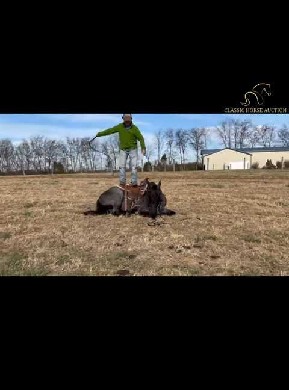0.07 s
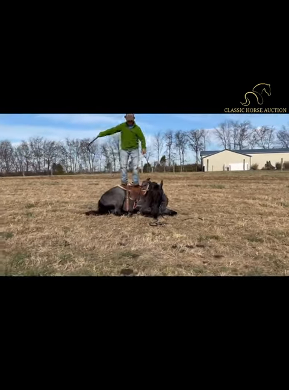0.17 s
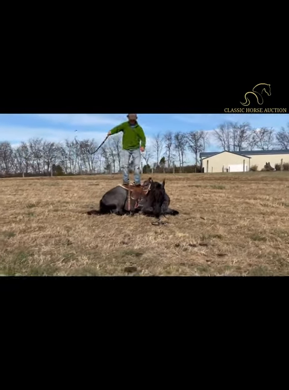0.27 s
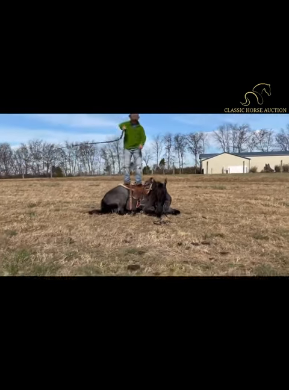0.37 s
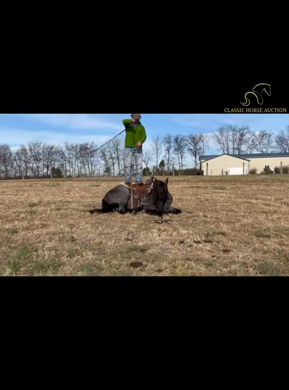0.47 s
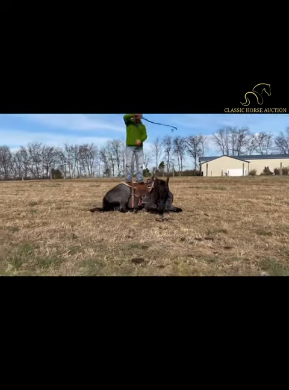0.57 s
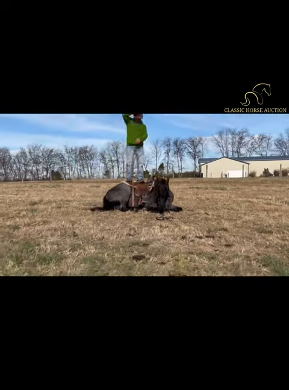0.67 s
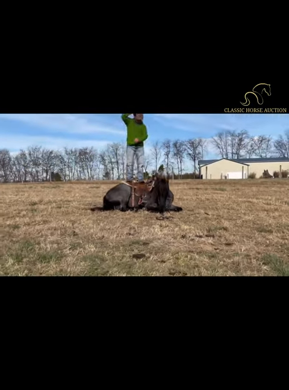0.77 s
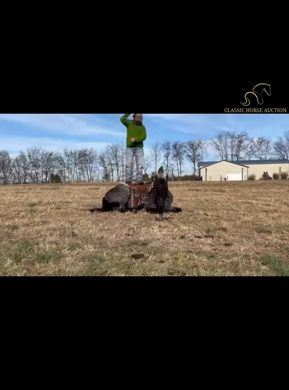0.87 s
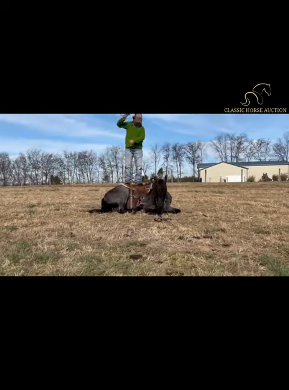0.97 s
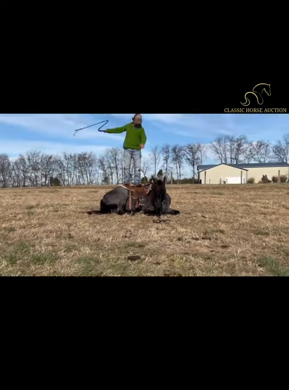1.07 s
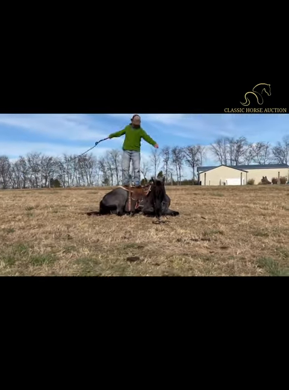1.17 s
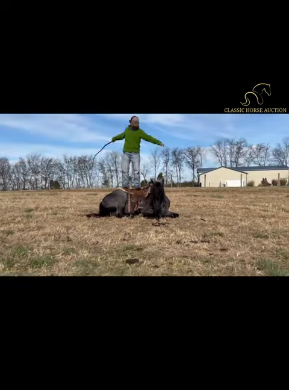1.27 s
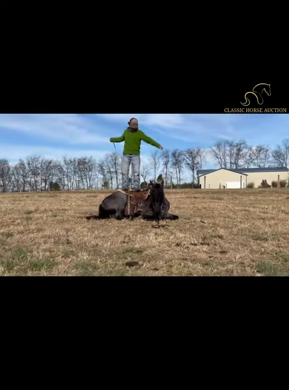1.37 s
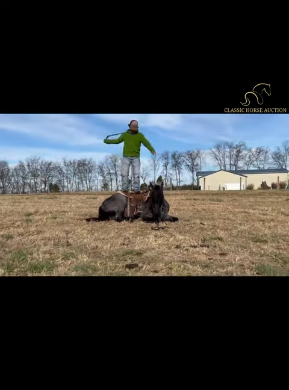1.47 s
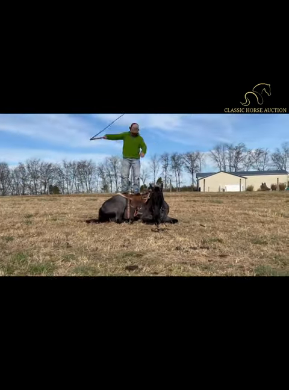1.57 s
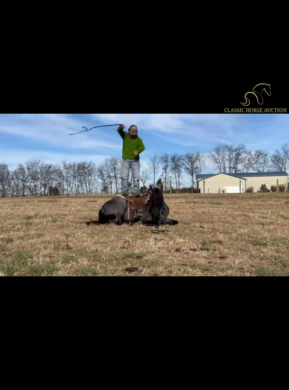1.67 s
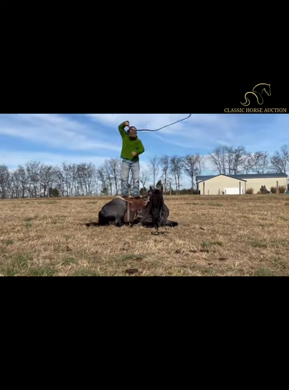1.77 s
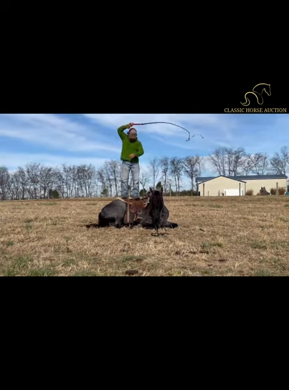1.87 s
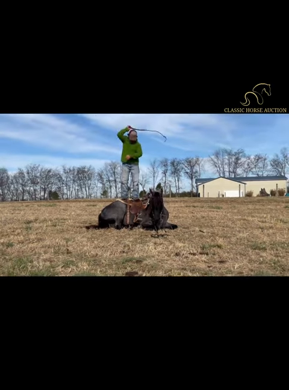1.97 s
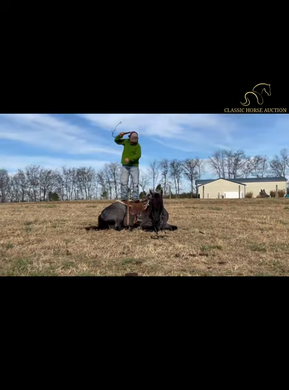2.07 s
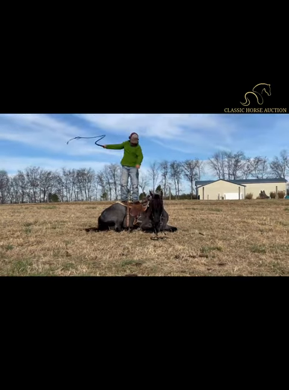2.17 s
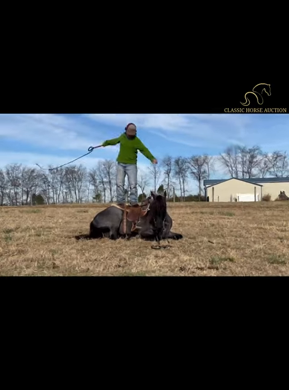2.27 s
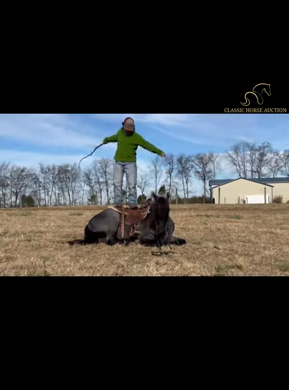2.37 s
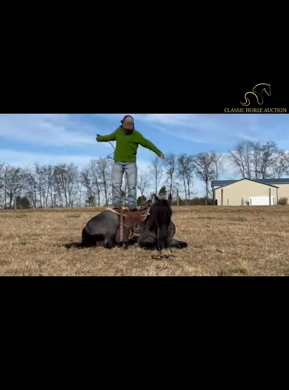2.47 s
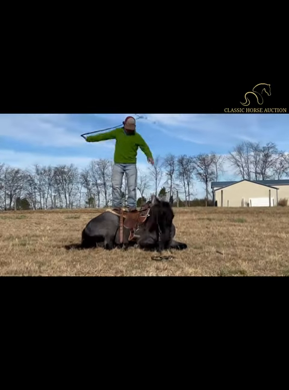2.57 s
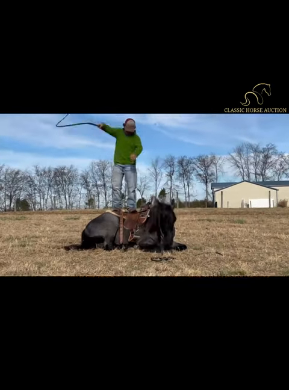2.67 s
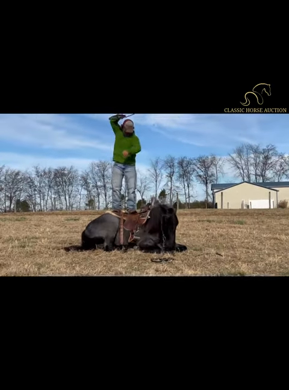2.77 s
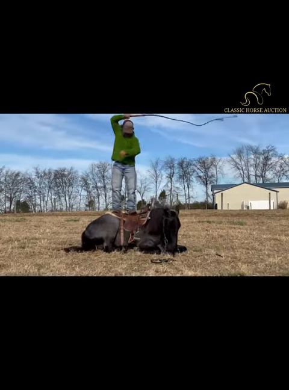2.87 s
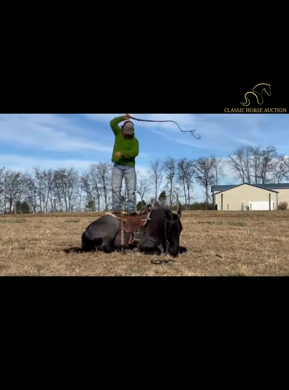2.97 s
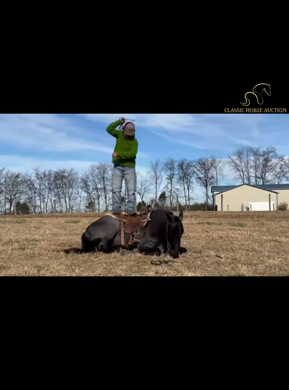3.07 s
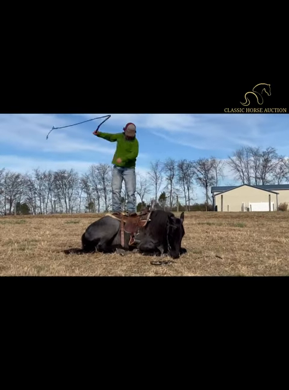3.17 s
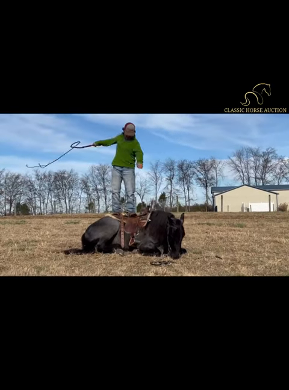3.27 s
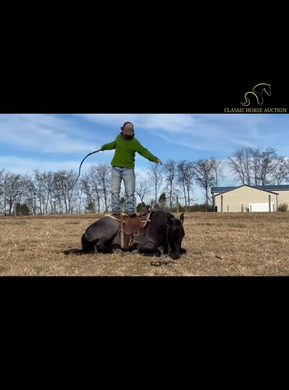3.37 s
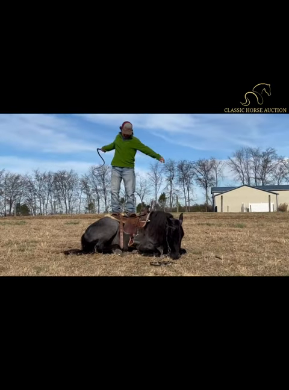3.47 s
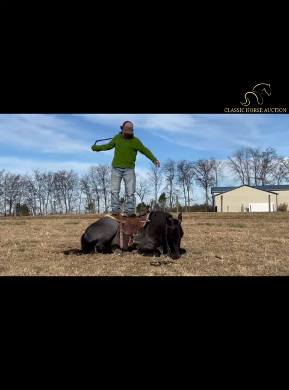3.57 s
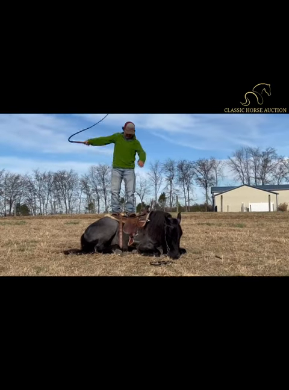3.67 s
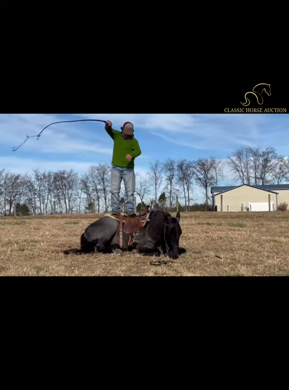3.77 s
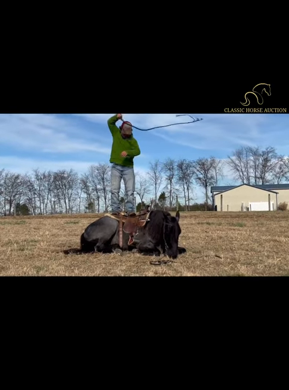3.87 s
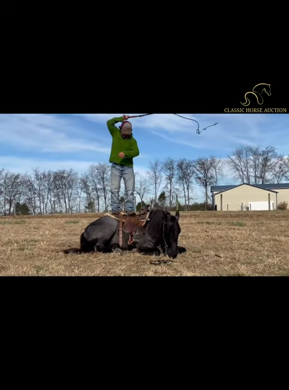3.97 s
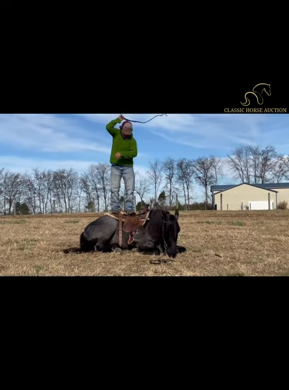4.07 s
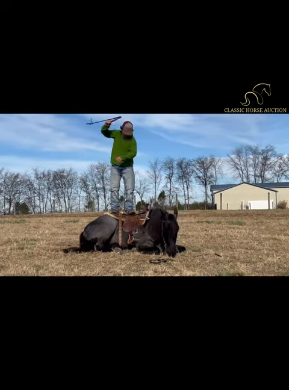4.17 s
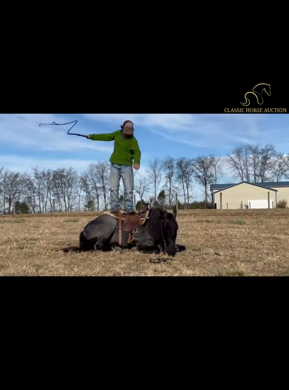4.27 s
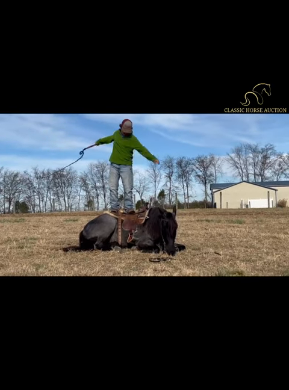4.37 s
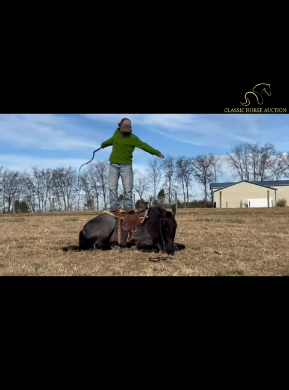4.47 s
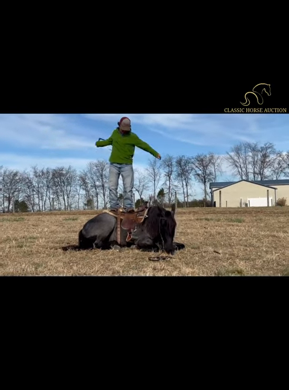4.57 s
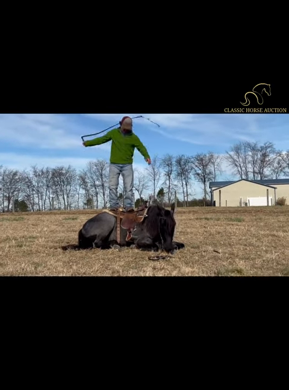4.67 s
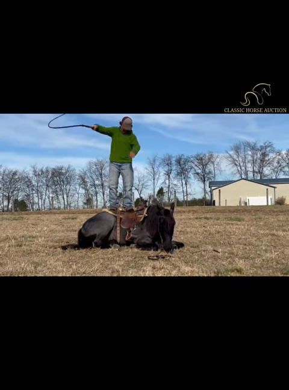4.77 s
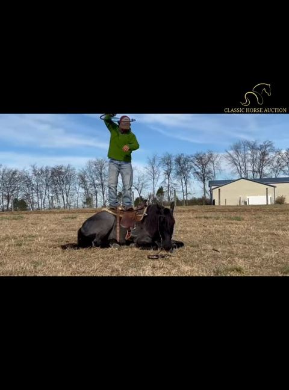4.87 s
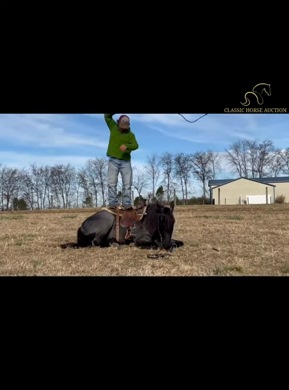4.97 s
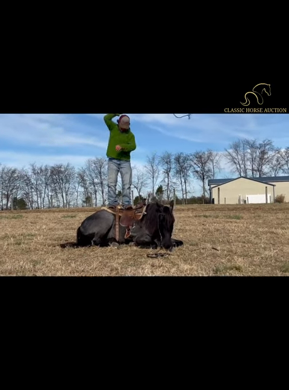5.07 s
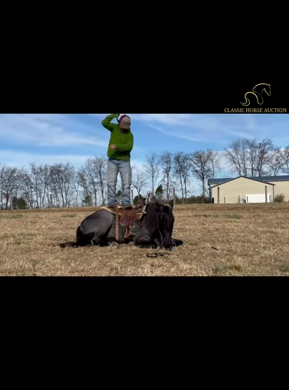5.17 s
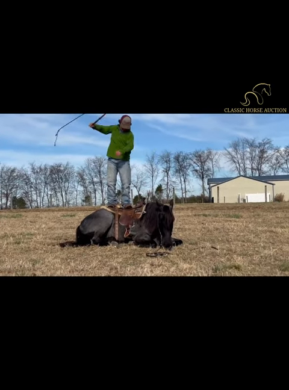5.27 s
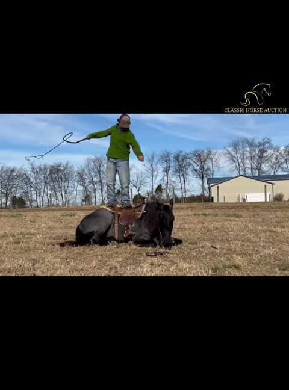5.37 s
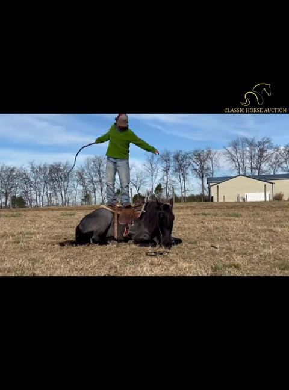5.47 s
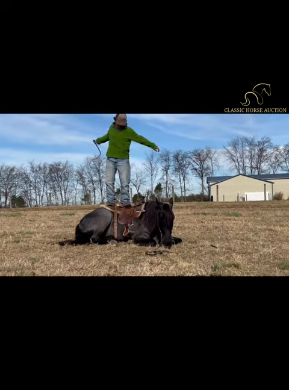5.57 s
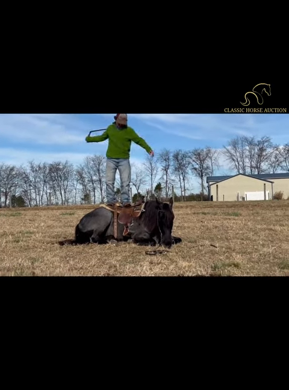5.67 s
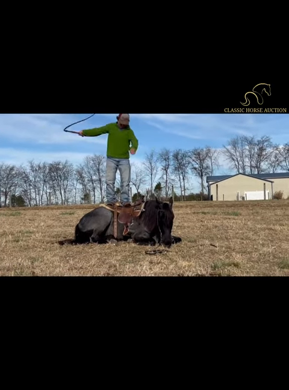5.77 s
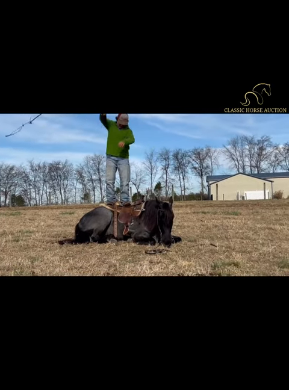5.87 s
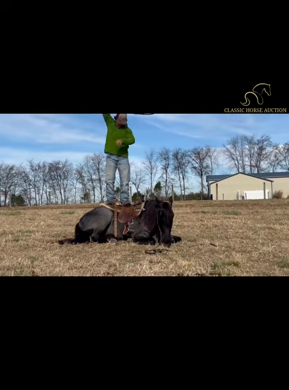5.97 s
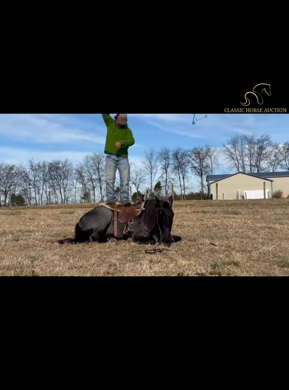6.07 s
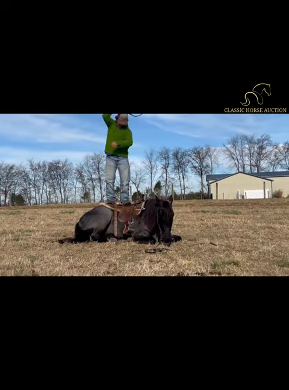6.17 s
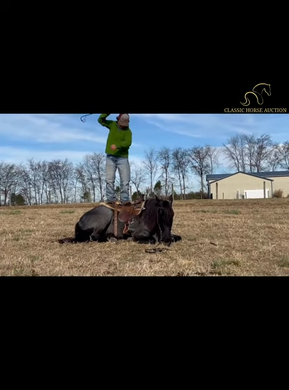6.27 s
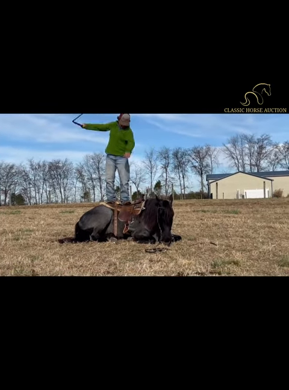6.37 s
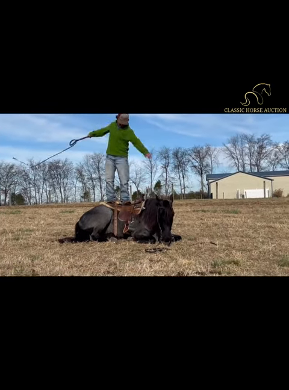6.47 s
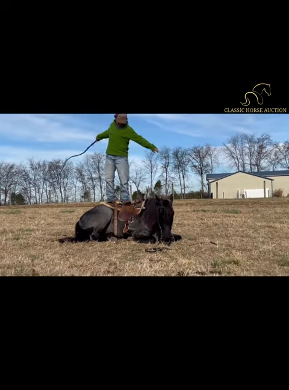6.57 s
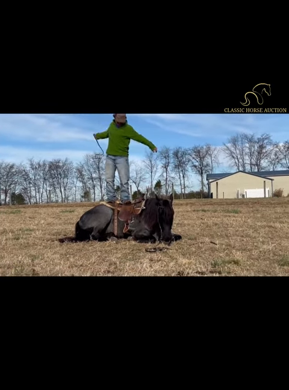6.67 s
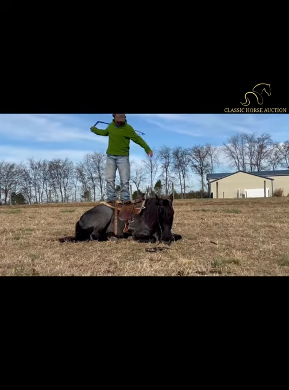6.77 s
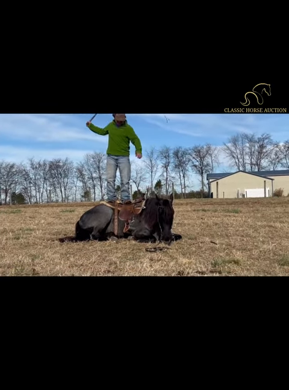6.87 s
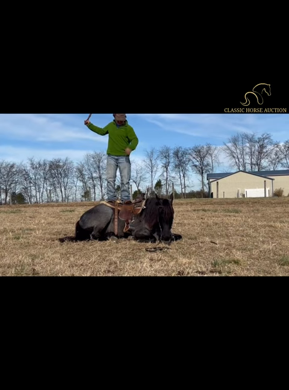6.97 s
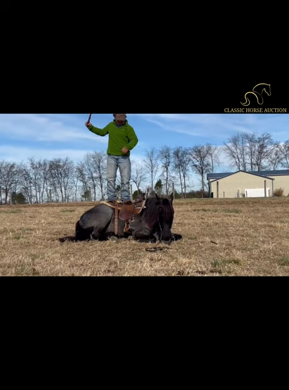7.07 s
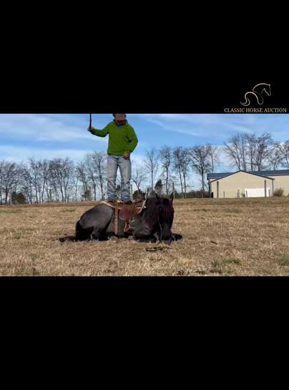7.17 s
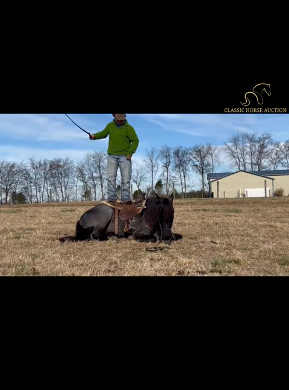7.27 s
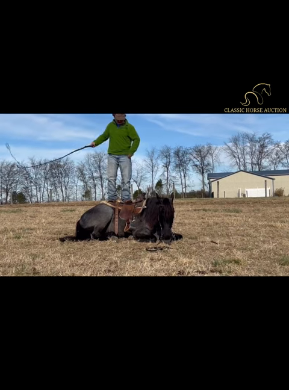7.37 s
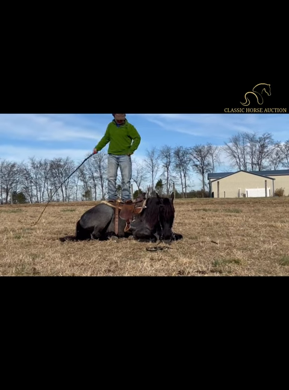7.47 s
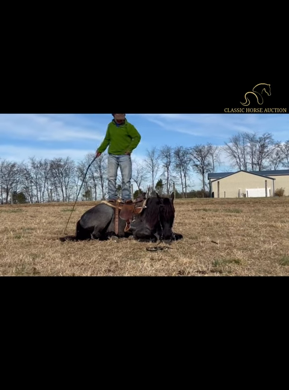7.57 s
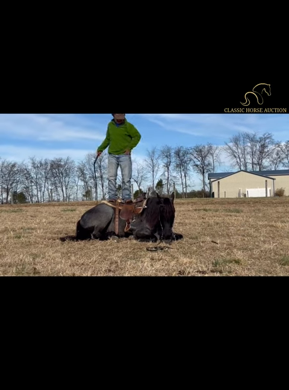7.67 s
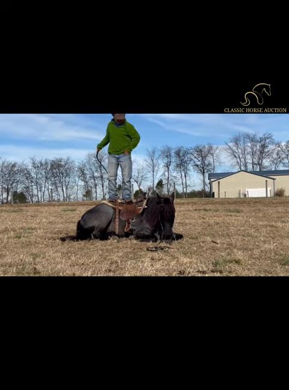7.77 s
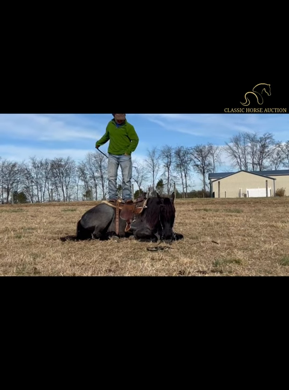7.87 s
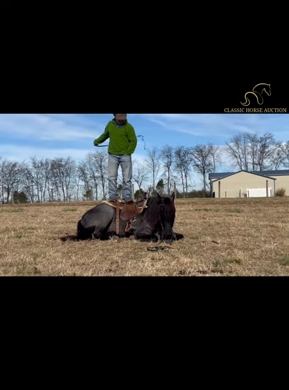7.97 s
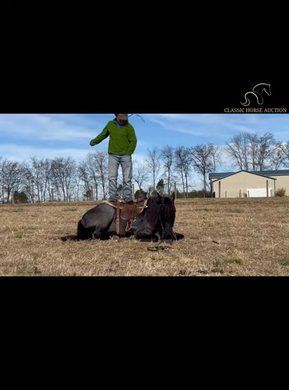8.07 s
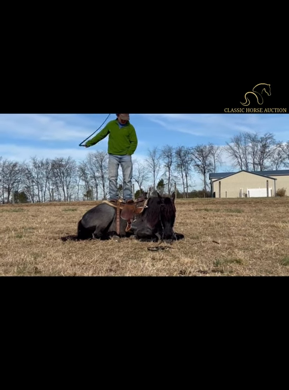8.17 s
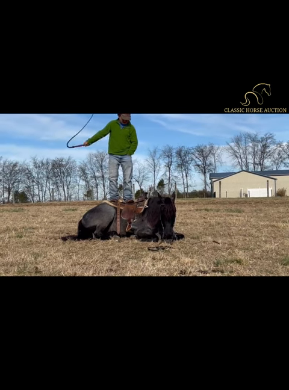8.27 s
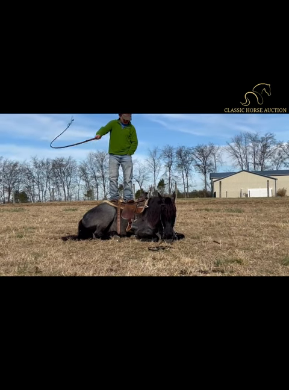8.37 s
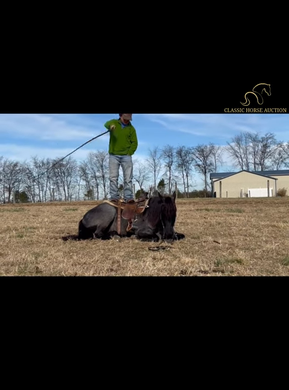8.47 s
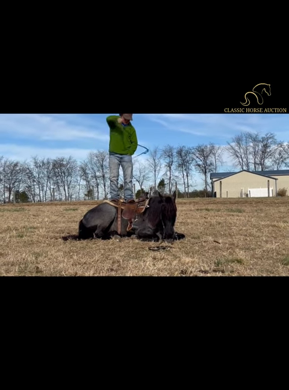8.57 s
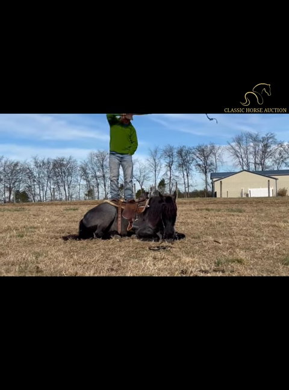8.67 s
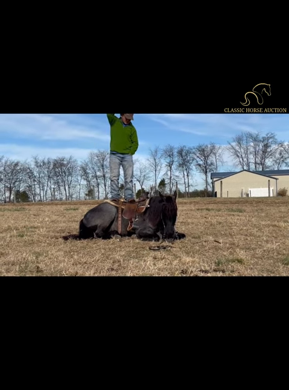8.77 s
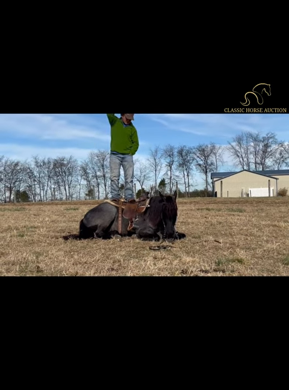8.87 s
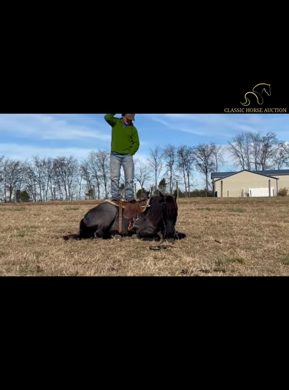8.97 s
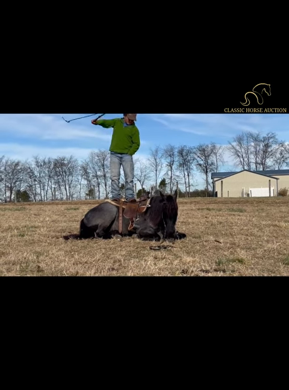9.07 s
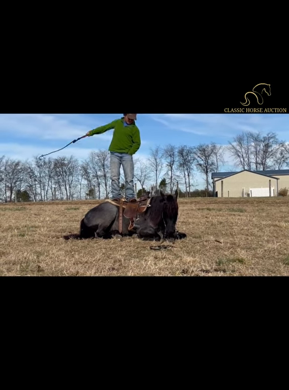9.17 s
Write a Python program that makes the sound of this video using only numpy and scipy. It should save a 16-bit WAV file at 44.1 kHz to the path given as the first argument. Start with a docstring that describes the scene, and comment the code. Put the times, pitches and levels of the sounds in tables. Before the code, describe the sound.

Low wind buffets the microphone softly outdoors while a lash rustles faintly in dry grass. Then comes a steady run of loud whip cracks, alternating between bright snaps and fuller pops, each led by a light swish and trailed by echoes off a building and distant trees. A lull follows with only wind, tiny ticks and grass rustle, and a single softer crack ends it.

```python
"""A long whip cracks in an open winter field, in turn out to the side and forward over the head.
Its tip goes supersonic and radiates a shock wave with a duller pop, heard directly and by ground
reflection. Grass scatters each crack; a nearby wall, a barn and distant trees return it as echoes.
Between cracks the lash sheds vortices, snaps lightly and drags through dry grass, with faint ticks.
Beneath it all, turbulent wind makes gusts on the microphone and a low rumble."""
import sys
import numpy as np
from scipy import signal
from scipy.fft import rfft, irfft, next_fast_len
from scipy.io import wavfile

SR = 44100
rng = np.random.default_rng(int(sys.argv[2]) if len(sys.argv) > 2 else 0)


def inscribe(sig):
    """Save sig as 16-bit PCM at rate SR to the path in sys.argv[1].

    A 1-D sig is mono; a 2-D sig holds one channel per row.
    Samples are clipped to [-1, 1] before scaling.
    """
    pcm = np.round(np.clip(np.atleast_2d(sig).T, -1, 1) * 32767)
    wavfile.write(sys.argv[1], SR, pcm.astype(np.int16))


N = 406161
TIME = np.arange(N) / SR

# Spectra of the shock, pop, rush and sizzle: (frequency [Hz], relative level [dB])
SHOCK_SPECTRUM = [(40, -21.5), (200, -13.5), (500, -2), (950, 0.5), (1900, -0.5), (2600, 3), (3200, 0),
                  (4100, -0.5), (6000, -6.5), (8500, -5), (11000, -16), (16000, -21.5)]
POP_SPECTRUM = [(40, -20), (90, -10), (160, -3), (270, -6), (500, 1.5), (1100, -1.5), (2000, -11),
                (4000, -26.5), (16000, -48.5)]
RUSH_SPECTRUM = [(100, -18.5), (400, -2), (900, 0), (1600, -3), (3500, -13), (8000, -17.5), (16000, -28.5)]
SIZZLE_SPECTRUM = [(500, -24.5), (2000, -13), (5000, -4), (8000, 0), (11500, -1.5), (15500, -4.5)]
# Treble shelf of the shock, whose gain varies by crack: (onset [Hz], full effect [Hz])
SHELF_HZ = (7800, 12200)
# Traits of each aim: (rush [dB], wall echo [dB], tree echo [dB], whoosh pitch [Hz],
# whoosh width [ratio], whoosh lead [s], follow-through [dB], tip hiss [dB])
THROWS = {"side": dict(rush_db=-52.5, wall_db=-71, trees_db=-61.5, whoosh_hz=495, whoosh_width=0.72, lead_s=.04, follow_db=-20, tip_db=-74),
          "front": dict(rush_db=-53, wall_db=-44.5, trees_db=-85.5, whoosh_hz=377.16, whoosh_width=0.88, lead_s=.052, follow_db=-5.5, tip_db=-85)}
# Cracks, with relative levels: (time [s], aim, shock [dB], pop [dB], ground lag [s],
# reflected shock [dB], reflected pop [dB], sizzle [dB], treble shelf [dB], whirr [dB], thump [dB],
# swing [dB], echo [dB], late slap [dB], slap delay [s])
WHIP_CRACKS = [(1.167, "side", 9, -1.5, .0043, 4.5, -14, -7.5, 0.5, -12.5, -42.5, -70.5, 1.5, -46.5, 0.35),
               (1.712, "front", 0.57, -18.5, .0047, 8.5, 0, -8.5, -9, -32, -49.5, -67, -2, -36, 0.23),
               (2.2585, "side", 9.5, -7, .0057, -3.5, -9.5, -6, -3, -14, -27, -70.5, 0.5, -44, .3455),
               (2.7739, "front", -8, 0, .0061, 0.2, 4.5, -12.5, -5.5, -32, -47, -64.5, -10, -39, .223),
               (3.2918, "side", 10, -9, .0065, -2.5, -18.5, -7, -2.5, -32.5, -42, -69, -1, -59.5, 0.34),
               (3.8247, "front", -1.5, 6.5, .0071, 0.5, 0, 0, 4, -29, -45.5, -59, 3, -55.5, .2265),
               (4.3475, "side", 8.5, -15.5, .007, -7, -18, -4.5, -7.5, -29, -42.5, -66.5, -6, -50, 0.34),
               (4.8714, "front", -7.5, -0.5, .005, 4.5, 6.5, -2, -7, -31.5, -43.5, -63, 1.5, -61, .225),
               (5.399, "side", 8, -10, .006, -19, -25.5, -3, 0.5, -17, -27, -62.5, 3.5, -44.5, .345),
               (5.9219, "front", 1, 7.5, .0058, 4, 5, -3, -2.5, -30.5, -47, -58.5, 5.5, -43.5, .2235),
               (6.4514, "side", 8, -13, .0063, -4, -8.5, -3.5, 0, -29.5, -43, -63.5, 1.5, -49, 0.35),
               (9.194, "front", -6.5, -29.5, .0081, -7.5, -1.2997, -9.5, -1.5, -35, -51, -68.5, -1, -45, 0.2666)]
def cracks(near_lag_s=.00174, near_shock=.093, near_pop=.86, close_lag_s=.00062, close_share=.083):
    """Shock formation: the supersonic tip's pulse arrives directly and off ground and near surfaces."""
    out = np.zeros((2, N))
    pop = disperse(disperse(pulse(POP_SPECTRUM), hz=1502.4, q=.27), hz=140, q=1)
    lead = np.arange(int(.025 * SR))[::-1] / SR  # time left until the shock
    for s, aim, shock_db, pop_db, lag, shock2_db, pop2_db, sizzle_db, shelf_db, *_ in WHIP_CRACKS:
        spectrum = [(hz, db + np.interp(hz, SHELF_HZ, [0, shelf_db])) for hz, db in SHOCK_SPECTRUM]
        shock = disperse(disperse(pulse(spectrum), hz=4423, q=1), hz=198, q=.89)
        strongest_db = max(shock_db, shock2_db)
        for arrival, sharp_db, dull_db in (s, shock_db, pop_db), (s + lag, shock2_db, pop2_db):
            front = arrival - .0001
            sharp, dull = amp(sharp_db) * shock, amp(dull_db) * pop
            add(out, front, sharp + dull)
            add(out, front + close_lag_s, close_share * sharp)
            add(out, front + near_lag_s, near_shock * sharp + near_pop * dull)
            # the frayed tip sizzles just ahead of the shock
            sizzle = np.exp(-lead / .00041) * noise(SIZZLE_SPECTRUM, len(lead), side_db=-1.5)
            sizzle /= np.linalg.norm(sizzle)
            add(out, arrival - len(lead) / SR, amp(sizzle_db + sharp_db - strongest_db + 6) * sizzle)
        # the loop gathers speed as it runs down the lash
        speed = np.exp(-lead / .011) + 9 * np.exp(-lead / .0017)
        rush = speed * noise(RUSH_SPECTRUM, len(lead), side_db=-2.5)
        add(out, s - len(lead) / SR, amp(strongest_db + THROWS[aim]["rush_db"]) * rush)
    return out


def whirrs(whirr_hz=950, rise_s=.0038):
    """Turbulence: the rolling loop tears the air in the last milliseconds before each crack."""
    out, lead = np.zeros((2, N)), np.arange(int(.018 * SR))[::-1] / SR
    shape = np.exp(-lead / rise_s) * (1 - np.exp(-lead / .00069))
    for s, *_, whirr_db, _, _, _, _, _ in WHIP_CRACKS:
        tear = burst(shape, band(whirr_hz, width=1, skirt_db=-12), side_db=0)
        add(out, s - len(lead) / SR, amp(whirr_db) * tear)
    return out


def thumps(start_hz=170, end_hz=62, glide_s=.0066, decay_s=.022):
    """Air displacement: a push of falling pitch follows each crack, out of phase at the two ports."""
    out, age = np.zeros((2, N)), np.arange(int(.15 * SR)) / SR
    hz = end_hz + (start_hz - end_hz) * np.exp(-age / glide_s)
    phase = 2 * np.pi * np.cumsum(hz) / SR + np.array([[0], [1.1]])
    wave = np.sin(phase) * (1 - np.exp(-age / .0028)) * np.exp(-age / decay_s)
    for s, *_, thump_db, _, _, _, _ in WHIP_CRACKS:
        add(out, s + .013, amp(thump_db + 8) * wave)
    return out


def swings(half_s=.035, follow_s=.11, follow_hz=450):
    """Vortex shedding: the thong whooshes into each crack and more weakly after it."""
    out = np.zeros((2, N))
    for s, aim, *_, swing_db, _, _, _ in WHIP_CRACKS:
        throw = THROWS[aim]
        approach = (s - throw["lead_s"], swing_db, half_s, throw["whoosh_hz"])
        follow = (s + follow_s, swing_db + throw["follow_db"], half_s, follow_hz)
        out += eddies([approach, follow], width=throw["whoosh_width"], skirt_db=-20, side_db=-10)
    return out


# Spectra of moving air and of the hiss of tip and grass: (frequency [Hz], relative level [dB])
AIR_SPECTRUM = [(100, -9.5), (350, -2), (750, 0.5), (1200, -4.5), (2200, -10.5), (4000, -17), (8000, -25.5),
                (16000, -36)]
HISS_SPECTRUM = [(200, -6), (1500, 2.5), (3000, -6), (8000, -2), (11000, -1.5), (16000, -7.5)]
def swishes(air_db=-77, air_lead_s=.043, tip_lead_s=.025):
    """Flow noise: each throw stirs a broad rush of air, and the thin tip hisses before it cracks."""
    air = tip = 0
    for s, aim, *_ in WHIP_CRACKS:
        air += amp(air_db) * swell(TIME - s + air_lead_s, half_s=.031)
        tip += amp(THROWS[aim]["tip_db"]) * swell(TIME - s + tip_lead_s, half_s=.036)
    return air * noise(AIR_SPECTRUM, N, side_db=-9.5) + tip * noise(HISS_SPECTRUM, N, side_db=-9)


# Spectrum of a small crack's body: (frequency [Hz], relative level [dB])
SNAP_SPECTRUM = [(100, -30.5), (500, -1), (1300, -0.5), (2500, -2), (6000, -30), (16000, -111)]
def flick(level_db, treble_db):
    """Superposition: a small crack sums with its weak reflection and a short fizz."""
    wave = amp(level_db + 7) * pulse(SNAP_SPECTRUM) + amp(treble_db + 19) * pulse(SHOCK_SPECTRUM)
    age = np.arange(len(wave)) / SR
    bounce = .3 * np.interp(age - .0028, age, wave, left=0)
    fizz = np.exp(-age / .0023) * noise(RUSH_SPECTRUM, len(age), side_db=-40)
    return wave + bounce + amp(level_db - 10.5) * fizz


# Light snaps of the lash: (time [s], relative level [dB], relative treble [dB])
LASH_SNAPS = [(.263, -57, -59.5), (.457, -72.5, -54.5), (.567, -50, -60), (3.723, -32, -74)]
def snaps():
    """Impulsive radiation: small flicks of the lash send out weak pulses."""
    out = np.zeros((2, N))
    for s, level_db, treble_db in LASH_SNAPS:
        add(out, s, flick(level_db, treble_db))
    return out


# Drags through dry grass: (start [s], attack [s], hold [s], release [s], rustle [dB], brushing [dB])
GRASS_DRAGS = [(0, .22, 0.3, 0.13, -68, -76), (.86, 0.11, 0.02312, 0.15, -65, -77),
               (1.541, .06, .06, .06, -84.5, -75), (2.927, 0.068, 0.19, 0.1, -78.5, -79),
               (7.552, 0.03, 0.04723, 0.14, -72, -91), (7.782, 0.1634, .1, .15, -97, -82),
               (8.475, 0.02713, 0.004674, 0.085, -71, -65)]
def drags(rough_db=2, stalks_per_s=30, stalk_db=-7):
    """Friction: the trailing lash rustles blades and ticks on stalks, over a duller brushing."""
    rustle = brush = 0
    for s, attack, hold, release, rustle_db, brush_db in GRASS_DRAGS:
        speed = np.interp(TIME, s + np.cumsum([0, attack, hold, release]), [0, 1, 1, 0])
        rustle += amp(rustle_db) * speed ** 1.2
        brush += amp(brush_db) * speed
    blades = amp(rough_db * flicker(N, per_s=81)) * noise(HISS_SPECTRUM, N, side_db=-6.5)
    stalks = amp(stalk_db) * grains(HISS_SPECTRUM, N, per_s=stalks_per_s, haze_db=-31.5)
    return rustle * (blades + stalks) + brush * noise(AIR_SPECTRUM, N, side_db=-7.5)


# Spectrum of a dry tick: (frequency [Hz], relative level [dB])
TICK_SPECTRUM = [(200, 1), (1000, -16.5), (1800, 4.5), (3200, -1), (5000, -23.5), (8000, -60), (16000, -50)]
# Single ticks: (time [s], relative level [dB])
SINGLE_TICKS = [(7.1293, -61), (7.175, -56.5), (7.2106, -57), (7.2914, -61), (7.47, -63), (7.5079, -59),
                (7.5384, -59), (7.8352, -65), (7.9722, -61), (8.9585, -61)]
# Runs of ticks: (start [s], length [s], rate [1/s], relative level [dB])
QUICK_RUNS = [(7.082, .08, 42.5, -59.5), (7.554, .04, 24, -59.5), (9.069, .06, 95, -58.5)]
def ticks(gain_db=-3, decay_s=.0021):
    """Damped transients: faint dry ticks sound singly and in runs while the whip rests."""
    out, age = np.zeros((2, N)), np.arange(int(.07 * SR)) / SR
    runs = [(s + k / per_s, db) for s, length, per_s, db in QUICK_RUNS
            for k in range(int(length * per_s) + 1)]
    for s, level_db in list(SINGLE_TICKS) + runs:
        tick = np.exp(-age / decay_s) * noise(TICK_SPECTRUM, len(age), side_db=-19)
        add(out, s + .00085, amp(level_db + gain_db) * tick)
    return out


# Spectra returned by grass and wall: (frequency [Hz], relative level [dB])
GRASS_SPECTRUM = [(100, -5), (400, 3.5), (1000, -1), (2500, -3.5), (6000, -4), (8500, -3.5), (11000, -7.5),
                  (16000, -10)]
WALL_SPECTRUM = [(200, -39), (1200, -15.5), (1800, 2.5), (3500, -8.5), (6000, -6), (9000, -13),
                 (12000, -19.5), (16000, -17.5)]
def near_echoes(wall_lag_s=.0488):
    """Early reflections: stubble scatters each crack; a wall returns it and its ground bounce."""
    out, age = np.zeros((2, N)), np.arange(int(.25 * SR)) / SR
    grass_fade = amp(-53) * (4 * np.exp(-age / .024) + 20 * np.exp(-age / .0058))
    wall_fade = 1.9 * np.exp(-age / .0068) + .1 * np.exp(-age / .024)
    for s, aim, shock_db, pop_db, lag, shock2_db, pop2_db, *_, echo_db, _, _ in WHIP_CRACKS:
        add(out, s + .002, grass_fade * grains(GRASS_SPECTRUM, len(age), per_s=1200, haze_db=-3.5))
        shares = amp([pop_db, pop2_db]) + amp([shock_db, shock2_db])
        for arrival, share in zip((s, s + lag), shares / np.linalg.norm(shares)):
            slap = wall_fade * grains(WALL_SPECTRUM, len(age), per_s=7700, haze_db=-4.5)
            add(out, arrival + wall_lag_s, share * amp(THROWS[aim]["wall_db"] + echo_db) * slap)
    return out


def late_slaps(barn_decay_s=.0048):
    """Discrete echo: bright off the barn for side cracks, earlier and duller for forward ones."""
    out, age = np.zeros((2, N)), np.arange(SR // 10) / SR
    for s, aim, *_, slap_db, delay_s in WHIP_CRACKS:
        if aim == "side":
            slap = amp(slap_db) * np.exp(-age / barn_decay_s) * noise(TICK_SPECTRUM, len(age), -1)
        else:
            slap = flick(slap_db, treble_db=min(-68, slap_db - 24.5))
        add(out, s + delay_s, slap)
    return out


# Spectra returned by the tree line and by farther trees: (frequency [Hz], relative level [dB])
TREE_SPECTRUM = [(200, -13), (1000, -11.5), (1900, -0.5), (3500, -1), (6000, -8.5), (8500, -16),
                 (10500, -36), (16000, -50.5)]
FAR_SPECTRUM = [(200, -7.5), (1000, -2.5), (1900, 0.5), (3500, -7), (6000, -18), (10000, -35.5),
                (16000, -53)]
# Echoes from stands of trees: (delay [s], spread [s], relative level [dB])
TREE_LINE = [(0.19, 0.01, -8), (.207, .02, 0), (.246, 0.022223, 3.5), (.346, .024, -5), (.3, .05, -14)]
FAR_TREES = [(.25, .24, -3.5), (.7, .065, -1), (1.25, .3, -10.5)]
def far_echoes(length_s=2, pop_share=.31):
    """Backscattering: trunks return many small copies of a crack, and the stands add in power."""
    out, age = np.zeros((2, N)), np.arange(length_s * SR) / SR
    line, far = (np.sqrt(sum((amp(db) * swell(age - delay, spread)) ** 2 for delay, spread, db in rows))
                 for rows in (TREE_LINE, FAR_TREES))
    for s, aim, _, pop_db, *_, echo_db, _, _ in WHIP_CRACKS:
        trunks = grains(TREE_SPECTRUM, len(age), per_s=330, haze_db=-4)
        far_trunks = grains(FAR_SPECTRUM, len(age), per_s=90, haze_db=0)
        add(out, s, amp(THROWS[aim]["trees_db"] + echo_db) * line * trunks)
        add(out, s, amp(-77 + pop_share * pop_db) * far * far_trunks)  # a heavy pop carries farther
    return out


# Low buffets of wind and short higher thuds: (time [s], level [dB], half length [s], pitch [Hz])
PUFFS_AND_THUDS = [(.38, -58.5, 0.024, 340), (.41, -44, .015, 116), (1.39, -50.5, 0.009, 217),
                   (1.6, -52, .028, 130), (1.41, -37, 0.017, 68), (1.82, -42.5, 0.014, 76.3),
                   (5.56, -41.5, 0.056, 50.3), (5.74, -51, 0.024, 232), (5.77, -42.5, 0.015, 82.2),
                   (6.14, -45, .026, 70.3), (6.25, -61.5, 0.00543, 217.5), (6.26, -41.5, 0.014, 77.34),
                   (8.52, -65, 0.01828, 332)]
def puffs_and_thuds():
    """Pressure fluctuation: low gusts buffet the microphone, and higher-pitched rows sound as short soft thuds."""
    return eddies(PUFFS_AND_THUDS, width=.94, skirt_db=-17, side_db=-11.5)


# Spectrum of the wind's rumble: (frequency [Hz], relative level [dB])
RUMBLE_SPECTRUM = [(20, -24.5), (42, -8.5), (66, 0), (90, -5), (112, -6.5), (150, -15.5), (185, -24.5),
                   (215, -22.5), (260, -33), (400, -42.5), (1500, -80.5)]
# Strength of the rumble: (time [s], level [dB])
WIND_LEVEL = [(0, -61), (.4, -55), (1.2, -54), (1.55, -48), (2.4, -52), (2.7, -54.5), (3.4, -54),
              (3.7, -54), (4.5, -53.5), (4.85, -48), (5.4, -58), (6.25, -52.5), (6.6, -55), (7.4, -56.5),
              (7.85, -59.5), (8.7, -56.5), (9.2, -63)]
def wind(lumps_db=3, air_db=-80, air_follows=.73, air_wander_db=3):
    """Ambient turbulence: a lumpy low rumble, and faint field air that rises with it."""
    wind_db = curve(WIND_LEVEL, TIME)
    rumble = amp(wind_db + lumps_db * flicker(N, per_s=14)) * noise(RUMBLE_SPECTRUM, N, side_db=-13)
    field_db = air_db + air_follows * (wind_db - wind_db.mean()) + air_wander_db * flicker(N, per_s=14)
    return rumble + amp(field_db) * noise(AIR_SPECTRUM, N, side_db=-8)


def eddies(rows, width, skirt_db, side_db):
    """Eddy noise: each row is a band of air noise that swells and fades."""
    out, t = np.zeros((2, N)), np.arange(SR // 2) / SR - 1 / 4
    for s, level_db, half_s, hz in rows:
        add(out, s + t[0], amp(level_db) * burst(swell(t, half_s), band(hz, width, skirt_db), side_db))
    return out


def grains(spectrum, size, per_s, haze_db):
    """Shot noise: randomly timed copies of a click in a continuous haze; rms 1."""
    clicks = (rng.random(size) < per_s / SR) * rng.choice([-1, 1], size) * rng.uniform(.15, 1, size)
    copies = signal.oaconvolve(clicks, pulse(spectrum, size=1024))[:size]
    return rms_one(rms_one(copies) + amp(haze_db) * noise(spectrum, size, side_db=-5.5))


def pulse(spectrum, size=8192):
    """Minimum phase: the most abrupt causal pulse with this spectrum; energy 1."""
    cepstrum = irfft(np.log(gains(spectrum, size)))
    cepstrum[1:size // 2] *= 2
    cepstrum[size // 2 + 1:] = 0
    wave = irfft(np.exp(rfft(cepstrum)))
    return wave / np.linalg.norm(wave)


def disperse(x, hz, q):
    """Group delay: an all-pass makes the tones around hz arrive late."""
    b, a = signal.iirpeak(hz, q, fs=SR)
    return x - 2 * signal.lfilter(b, a, x)


def burst(shape, spectrum, side_db):
    """Amplitude modulation: noise under an envelope, scaled to the envelope's rms."""
    return rms_one(shape * noise(spectrum, len(shape), side_db)) * np.sqrt(np.mean(shape ** 2))


def noise(spectrum, size, side_db):
    """Spectral shaping: stereo noise of rms 1, its side at side_db relative to its mid."""
    padded = next_fast_len(size)
    white = rng.standard_normal((2, padded))
    mid, side = irfft(rfft(white) * gains(spectrum, padded), padded)[:, :size]
    return rms_one(mid + amp(side_db) * side * np.array([[1], [-1]]))


def band(hz, width, skirt_db):
    """Band-pass spectrum: one peak with falling skirts."""
    return [(hz / 8, skirt_db - 19.5), (hz / (1 + width), skirt_db), (hz, 0),
            (hz * (1 + width), skirt_db), (hz * 10, skirt_db - 39), (hz * 40, -100)]


def gains(spectrum, size):
    """Magnitude response on the bins of a transform."""
    hz, db = np.transpose(spectrum)
    return amp(np.interp(np.log(np.fft.rfftfreq(size, 1 / SR) + 1), np.log(hz), db))


def flicker(size, per_s):
    """Random modulation of rms 1."""
    knots = np.arange(size) / SR * per_s
    return rms_one(np.interp(knots, np.arange(size), rng.standard_normal(size)))


def swell(t, half_s):
    """Gaussian envelope around time zero."""
    return np.exp(-(t / half_s) ** 2 / 2)


def curve(rows, x):
    """Linear interpolation of a two-column table."""
    return np.interp(x, *np.transpose(rows))


def amp(db):
    """Decibels to gain."""
    return 10 ** (np.asarray(db) / 20)


def rms_one(x):
    """Normalisation to rms 1."""
    return x / np.sqrt(np.mean(x ** 2) + 1e-20)


def add(out, s, sound):
    """Superposition of a sound starting at s seconds."""
    start = int(round(s * SR))
    first, last = max(start, 0), min(start + sound.shape[-1], N)
    if last > first:
        out[..., first:last] += sound[..., first - start:last - start]


# Lead of the left microphone port over the right: (frequency [Hz], phase [rad])
PORT_PHASE = [(30, 0.052), (250, 0.26), (1300, 0.3), (2200, 0.55), (5500, 0.33), (7500, 0.34), (9000, 1.1),
              (16000, 1.1)]
def ports(x):
    """Phase difference: the whip reaches the two microphone ports out of step."""
    size = next_fast_len(N + SR // 4)
    lead = curve(PORT_PHASE, np.fft.rfftfreq(size, 1 / SR))
    rotation = np.exp(1j * lead * np.array([[.5], [-.5]]))
    return irfft(rfft(x, size) * rotation, size)[:, :N]


def scene():
    """Linear superposition: whip, echoes and wind add as pressures."""
    whip = cracks() + whirrs() + swishes() + snaps() + ticks() + drags()
    echoes = near_echoes() + far_echoes() + late_slaps()
    buffeting = puffs_and_thuds()
    return ports(whip + echoes) + thumps() + swings() + buffeting + wind()


# Treble notches of the microphone: (frequency [Hz], width [Hz])
TREBLE_NOTCHES = [(10200, 1500), (13800, 1900)]
def record(dry):
    """Filtering and saturation: the microphone notches the treble, rounds peaks and cuts the top."""
    ceiling, cutoff_hz = .92, 16900
    for hz, width_hz in TREBLE_NOTCHES:
        dry = signal.lfilter(*signal.iirnotch(hz, hz / width_hz, fs=SR), dry)
    rounded = ceiling * np.tanh(dry / ceiling)
    return signal.sosfilt(signal.ellip(10, .3, 70, cutoff_hz, fs=SR, output="sos"), rounded)


dry = scene()
out = record(dry)
inscribe(out)
```